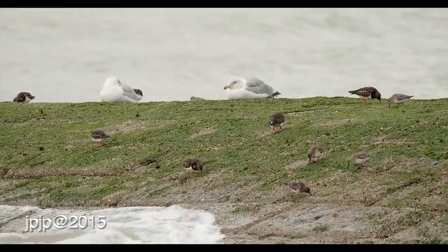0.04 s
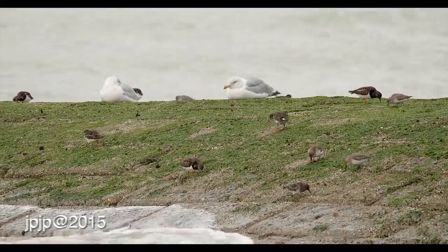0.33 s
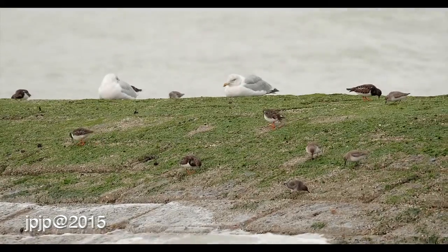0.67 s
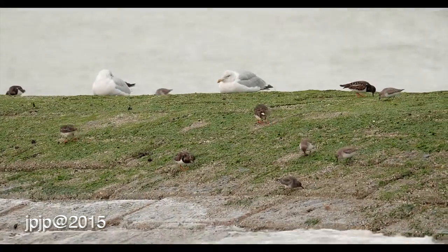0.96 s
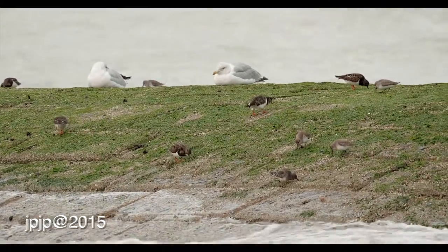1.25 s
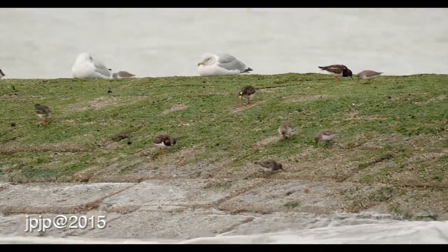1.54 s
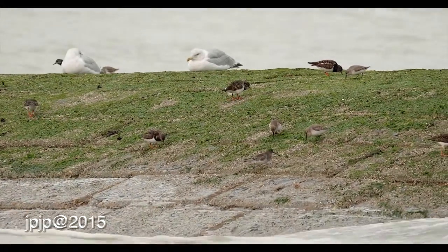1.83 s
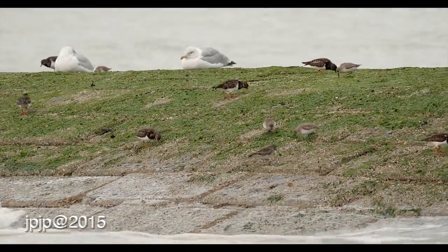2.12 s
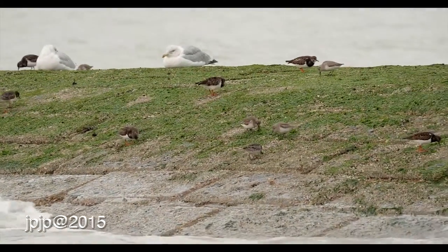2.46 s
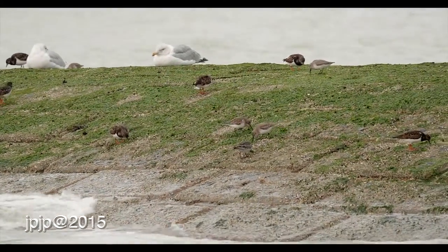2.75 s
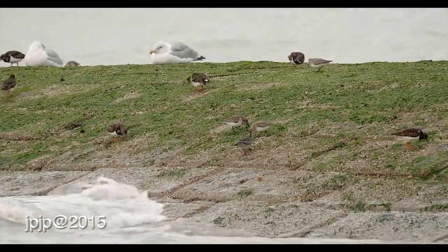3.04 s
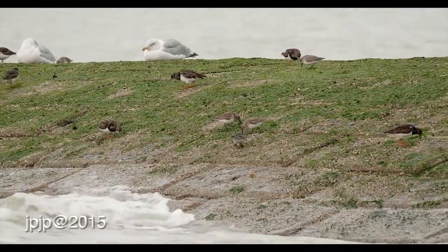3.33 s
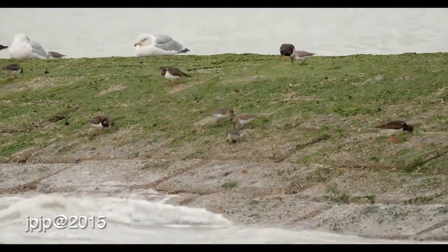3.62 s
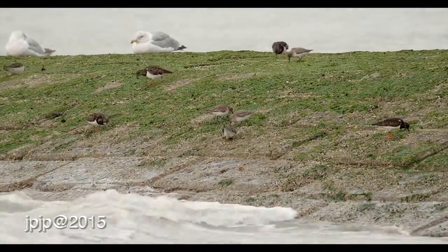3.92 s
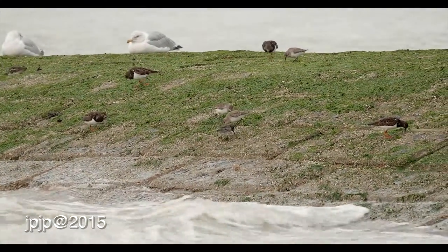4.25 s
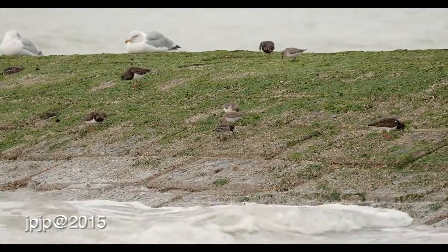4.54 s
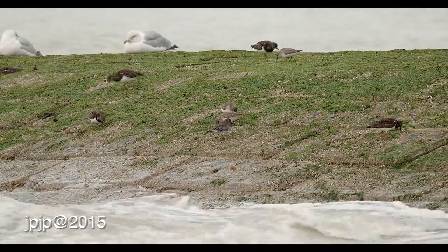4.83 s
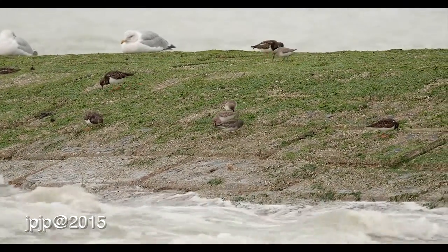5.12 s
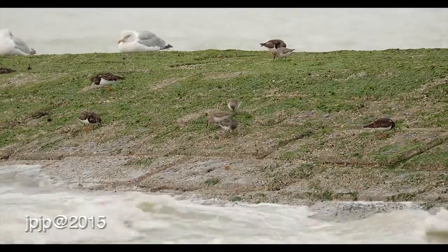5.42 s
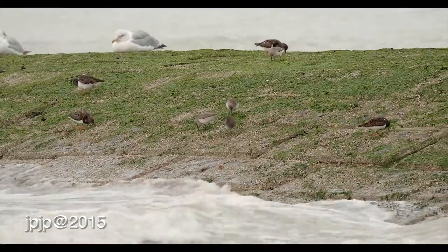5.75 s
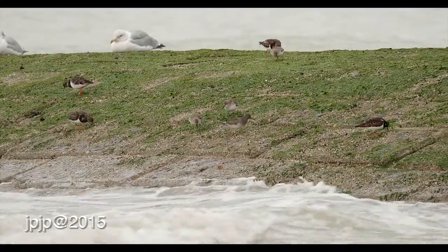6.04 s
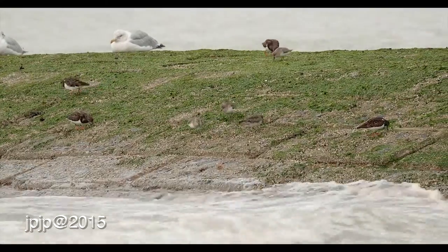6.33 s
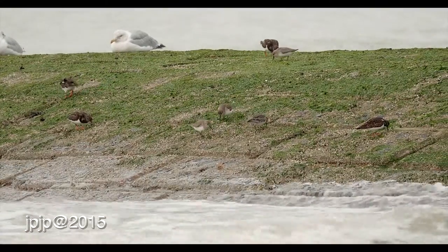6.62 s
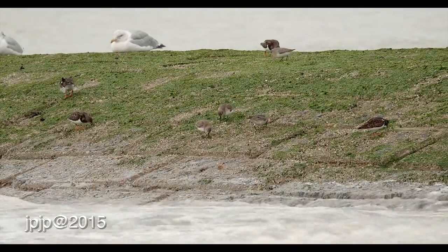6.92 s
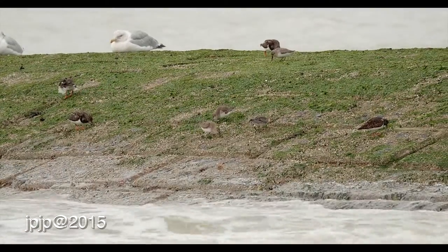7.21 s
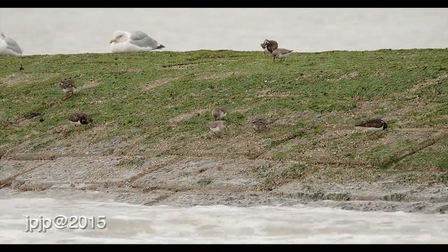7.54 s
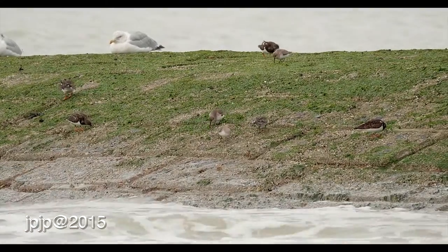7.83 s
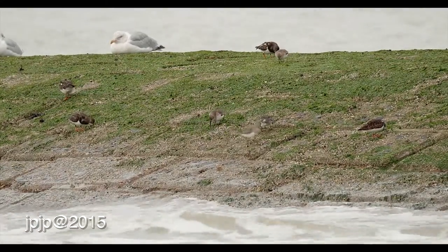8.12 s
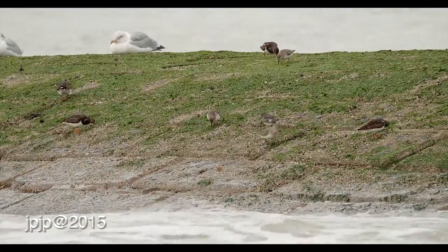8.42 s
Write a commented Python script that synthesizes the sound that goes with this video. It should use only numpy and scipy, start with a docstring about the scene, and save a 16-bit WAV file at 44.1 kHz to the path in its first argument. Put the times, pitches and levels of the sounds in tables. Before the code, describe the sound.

Surf roars steadily against a stone sea wall throughout, with a soft hiss of foam on top. From the first moment, wind buffets the microphone in rapid, low, ragged thumps over a fluttering rumble, mostly on the left. A few sharp pops cut through in the first 1.2 seconds. The puffs stay dense until about 2.7 seconds, drop away briefly, and return in a cluster from 3.3 to 3.8 seconds. A calmer stretch follows until about 5 seconds, broken by a quick burst near 4.2 and faint rumbles on the right. Buffeting resumes at about 5.2 seconds as the surf swells slightly, with more light gusts on the right between 6 and 7 seconds. After a short lull near 7.8 seconds, the puffs build again until the end at about 8.7. The sea dips briefly under each strong puff and swells back.

```python
"""At a stone sea wall on a windy day, surf is heard through a camera's close pair of microphone ports.
Breakers roar and foam hisses as broadband noise. Eddies flutter against the left port in short low
puffs of turbulent pressure; now and then a gust veers round and rumbles at the right one.
The camera's gain control ducks the sea at each strong puff and lets it swell back."""
import sys
import numpy as np
from scipy import signal
from scipy.fft import rfft, irfft, next_fast_len
from scipy.io import wavfile
from scipy.ndimage import uniform_filter1d, map_coordinates

SR = 44100
rng = np.random.default_rng(int(sys.argv[2]) if len(sys.argv) > 2 else 0)


def materialize(psi):
    """Save the field psi as 16-bit PCM at rate SR to the path in sys.argv[1].

    A 1-D psi becomes a single channel; in a 2-D psi each row is a channel.
    """
    bounded = np.clip(np.atleast_2d(psi).T, -1, 1)
    quanta = np.round(bounded * 32767).astype(np.int16)
    wavfile.write(sys.argv[1], SR, quanta)


N = 382347
EDDY_HZ = 220  # pitch of an ordinary eddy
# strength of the airflow at the windward, left port: t/s, level/dB
WINDWARD_FLOW = [(0, -26), (.6, -30.5), (1.3, -34.5), (1.6, -40.5), (2.15, -30), (2.8, -55), (3.5, -31),
                 (4.1, -47.5), (4.95, -49.5), (5.2, -34.5), (5.8, -32), (6.9, -37), (7.4, -29.5),
                 (7.85, -57), (8.67, -27.5)]


def amp(db):
    """Amplitude ratio: tenfold for every 20 dB."""
    return 10 ** (np.asarray(db) / 20)


def unit(x):
    """Normalisation to rms 1."""
    return x / np.sqrt(np.mean(x ** 2) + 1e-20)


def along(points, hz):
    """Interpolation of each column of a table on a logarithmic frequency axis."""
    f, *cols = np.transpose(points)
    return np.array([np.interp(np.log(hz + 1), np.log(f + 1), c) for c in cols])


def contour(rows):
    """Linear interpolation of (time, value) rows at every sample."""
    return np.interp(np.arange(N) / SR, *np.transpose(rows))


def wobble(rate):
    """Random modulation: a spline through `rate` Gaussian knots a second."""
    knots = rng.standard_normal(2048)
    return map_coordinates(knots, [np.arange(N) * rate / SR], mode="wrap")


def swell(t, centre, duration, edge):
    """Bell-shaped envelope, `duration` wide at half height; `edge` steepens its flanks."""
    return 1 / (1 + (2 * np.abs(t - centre) / duration) ** edge)


def smooth(x, seconds):
    """Time average under a triangular window."""
    size = max(1, int(seconds * SR))
    return uniform_filter1d(uniform_filter1d(x, size), size)


def held_to(x, power, seconds):
    """Envelope control: the running mean square of x is brought to the given power."""
    wanted = np.abs(smooth(power, seconds)) + 1e-9
    present = np.abs(smooth(x ** 2, seconds)) + 1e-9
    return x * np.sqrt(wanted / present)


def filtered(x, response):
    """Linear filtering: the spectrum is multiplied by a complex frequency response."""
    size = next_fast_len(N + SR // 4)
    return irfft(rfft(x, size) * response(np.fft.rfftfreq(size, 1 / SR)), size)[..., :N]


def low_cut(hz, corner_hz):
    """Second-order high-pass magnitude: 12 dB an octave below the corner."""
    return hz ** 2 / np.hypot(hz ** 2, corner_hz ** 2)


def noise(spectrum):
    """Spectral shaping of white noise, at rms 1."""
    return unit(filtered(rng.standard_normal(N), lambda hz: amp(along(spectrum, hz)[0])))


def patchy_pair(depth_db):
    """Two independent noises under one random modulation in time and frequency."""
    spectra = signal.stft(rng.standard_normal((2, N)), nperseg=512)[2]
    patches = uniform_filter1d(rng.standard_normal(spectra.shape[1:]), size=7, axis=0)
    patches = uniform_filter1d(patches, size=18, axis=1)
    return signal.istft(spectra * amp(depth_db * unit(patches)), nperseg=512)[1][:, :N]


def surf(foam_hz=4200, roar_db=4.5, foam_db=-12.5, foam_follows=0.84):
    """Partial coherence: roar and foam hiss reach the two ports with a frequency-dependent lag."""
    # roar, swelling as a wave runs up the wall: t/s, level/dB
    wave_levels = [(0, -38), (.3, -42.5), (.8, -41.5), (2.4, -44), (4.3, -42.5), (4.95, -41.5), (5.55, -40),
                   (6.5, -41), (7.7, -42.5), (8.67, -42)]
    # surf spectrum at the ports: f/Hz, left level/dB, right level/dB
    sea_spectrum = [(40.0, -8, -14), (120, 0, -0.5), (260.0, 0, -6), (507, -1.5, -0.5), (1045, -4.5, -10.5),
                    (1403, -5, -20), (2064, -12.5, -19), (2470, -16.5, -20), (3370, -11.6, -22.5),
                    (4510, -22.0, -23.5), (6000, -25, -24), (7400.0, -27, -26.5), (10170, -26.5, -27.5),
                    (12070, -32, -33), (15000.0, -47, -46)]
    # likeness of the surf at the two ports: f/Hz, coherence (0-1), phase lead of the left/rad
    port_coherence = [(120, .6, 0), (510, .79, .4), (920, .65, 1.7), (1430, .46, 3), (2000, .53, 3),
                      (3500, .58, 5.1), (4100, .42, 2.7), (5900, .35, 5.2), (6700, .3, 3.6), (7600, .5, 6),
                      (10000, .57, 5.6), (14000, .8, 6.3)]
    left, independent = patchy_pair(depth_db=0.5)
    coherence = lambda hz: along(port_coherence, hz)[0]
    right = filtered(left, lambda hz: coherence(hz) * np.exp(-1j * along(port_coherence, hz)[1]))
    right += filtered(independent, lambda hz: np.sqrt(1 - coherence(hz) ** 2))
    water = filtered(np.array([left, right]), lambda hz: amp(along(sea_spectrum, hz)))
    roar = filtered(water, lambda hz: 1 / (1 + (hz / foam_hz) ** 8))
    wave_db = contour(wave_levels)
    hiss_db = wave_db.mean() + foam_follows * (wave_db - wave_db.mean()) + foam_db
    churn_db = 0.4 * wobble(9)
    return unit(roar) * amp(wave_db + roar_db + churn_db) + unit(water - roar) * amp(hiss_db)


def airflow(left_db=-2.5, right_db=5.5, lee_db=-46.5, flutter_db=4.0):
    """Turbulence is local: each port rumbles independently, the right sheltered until a gust veers."""
    # rumble of the steady airflow: f/Hz, level/dB
    rumble_spectrum = [(20, -49), (70, -2.5), (110, 0), (175, -1.5), (310, -6.5), (450, -15), (800, -32),
                       (4000, -68)]
    # gusts that veer round to the right port: t/s, level/dB, duration/s
    veers = [(3.678, -34.5, 0.53), (4.162, -36, 0.09), (4.651, -38.5, 0.41), (5.935, -35.5, 0.19),
             (6.293, -37.5, 0.15), (6.913, -34.5, 0.56)]
    t = np.arange(N) / SR
    gust_power = sum((amp(db) * swell(t, s, duration, edge=3)) ** 2 for s, db, duration in veers)
    lee_flow = np.sqrt(amp(lee_db) ** 2 + gust_power)
    rumbles = [noise(rumble_spectrum) * amp(flutter_db * np.tanh(wobble(45))) for _ in range(2)]
    left, right = [held_to(rumble, np.ones(N), seconds=0.08) for rumble in rumbles]
    right = filtered(right, lambda hz: low_cut(hz, corner_hz=120))
    return np.array([left * amp(contour(WINDWARD_FLOW) + left_db), right * lee_flow * amp(right_db)])


def weak_eddies(count=160, per_second=18, offset_db=-0.5, scatter_db=5.5, typical_s=0.021):
    """Advection: small eddies arrive at uneven moments, about as strong as the flow that carries them."""
    jitter, strength, length = rng.standard_normal((count, 3)).T
    times = (np.arange(count) + jitter / 2) / per_second
    levels = np.interp(times, *np.transpose(WINDWARD_FLOW)) + offset_db + scatter_db * np.tanh(strength)
    rows = zip(times, levels, typical_s * 2 ** (length / 2), np.full(count, EDDY_HZ))
    return [row for row in rows if 0 < row[0] < N / SR]


def puffs(eddies, push_db=0.32, ragged_db=3.0, hard_db=-15, tear_db=-15.5, tear_exponent=0.95):
    """Turbulent pressure: each eddy gives a low thump and a brighter tearing that grows with its force."""
    # pressure at the port from an eddy pitched at EDDY_HZ: f/Hz, level/dB
    eddy_spectrum = [(20, -48), (40, -34), (65, -14), (100, -5.5), (160, 1), (220, 0), (310, -4),
                     (420, -11.5), (600, -24.5), (1000, -53), (2500, -74)]
    # tearing sound of a hard eddy: f/Hz, level/dB
    tear_spectrum = [(150, -21), (370, 9.5), (700, 3.5), (1050, -3), (1900, -34), (5000, -52)]
    t = np.arange(N) / SR
    power, weighted_pitch = np.zeros((2, N))
    for s, db, duration, hz in eddies:
        near = slice(max(0, int((s - .12) * SR)), int((s + .12) * SR))
        push = (amp(db) * swell(t[near], s, duration, edge=2.94)) ** 2
        power[near] += push
        weighted_pitch[near] += push * hz
    force = np.sqrt(power)
    # an eddy's force sets the size of the pressure swings, its pitch how fast they run
    speed = weighted_pitch / (power + 1e-20) / EDDY_HZ
    swirl = map_coordinates(noise(eddy_spectrum), [np.cumsum(speed) % N], order=1)
    sputter = amp(ragged_db * wobble(130))
    thumps = filtered(force * swirl * sputter, lambda hz: low_cut(hz, corner_hz=75))
    tear_gain = amp(hard_db + tear_db) * (force / amp(hard_db)) ** tear_exponent
    tearing = sputter * tear_gain * noise(tear_spectrum)
    return amp(push_db) * held_to(thumps, power, seconds=0.013) + tearing


def cracks():
    """Impulse excitation: the hardest eddies slap the port with one sharp jolt of pressure."""
    # jolts: t/s, peak level/dB, upper edge f/Hz
    jolts = [(.051, -3, 5000), (.224, -15, 1500), (.335, -10, 2700), (.511, -1.5, 1650), (1.113, -14, 1100)]
    # spectrum of a snap: f/Hz, level/dB
    snap_spectrum = [(100, -24), (300, -8), (750, 0), (1450, -2), (2100, -13), (8000, -20)]
    snaps = np.zeros(N)
    for s, db, top_hz in jolts:
        jolt = signal.unit_impulse(N, round(s * SR))
        snap = filtered(jolt, lambda hz: amp(along(snap_spectrum, hz)[0]) / (1 + (hz / top_hz) ** 10))
        snaps += amp(db) * snap / snap.max()
    return snaps


def wind():
    """Crosstalk: eddies strike mostly on the left; the stereo circuit feeds some of each port across."""
    # strong eddies at the left port: t/s, level/dB, duration/s, pitch f/Hz
    strong_eddies = [(0.053, -11, 0.028, 221.2), (0.092, -16, 0.011, 220.3), (0.222, -14, 0.014, 231),
                     (0.251, -12.5, 0.0099, 258), (0.333, -12, 0.024, 227.7), (0.371, -20.5, 0.011, 170.3),
                     (0.428, -14, 0.02, 189.9), (0.511, -9.5, 0.016, 240.3), (0.534, -16, 0.0077, 219.9),
                     (0.582, -20, 0.0099, 190), (0.622, -21.5, 0.016, 149.6), (0.727, -21, 0.0092, 239.2),
                     (0.747, -15, 0.019, 279.6), (0.774, -22.5, 0.0082, 231.2), (0.894, -13, 0.024, 220.5),
                     (0.966, -17, 0.014, 230.2), (0.998, -12, 0.025, 199), (1.036, -16.5, 0.014, 280),
                     (1.103, -13.5, 0.012, 301), (1.122, -12, 0.032, 280.2), (1.18, -14, 0.0087, 230.7),
                     (1.315, -23, 0.026, 210), (1.352, -17.5, 0.018, 220), (1.406, -11, 0.033, 240.7),
                     (1.593, -20, 0.011, 240), (1.745, -20.5, 0.026, 229.8), (1.797, -14, 0.009, 250.3),
                     (1.815, -18, 0.014, 211), (1.876, -20.5, 0.032, 208.9), (1.972, -24, 0.014, 210.2),
                     (2.005, -21.5, 0.016, 220), (2.027, -13, 0.011, 220.7), (2.112, -12.5, 0.012, 250.6),
                     (2.136, -16, 0.02, 280.8), (2.195, -14.5, 0.015, 208), (2.217, -16.5, 0.011, 219.1),
                     (2.256, -13.5, 0.016, 251), (2.29, -13, 0.028, 208.8), (2.39, -18, 0.024, 180.3),
                     (2.463, -23, 0.021, 169.2), (2.545, -21, 0.046, 229), (2.69, -19, 0.03, 198.8),
                     (3.023, -30, 0.014, 188.8), (3.27, -18.5, 0.019, 220.6), (3.392, -11, 0.019, 230.6),
                     (3.437, -16, 0.02, 200.2), (3.475, -13, 0.015, 290), (3.56, -26.5, 0.069, 181.1),
                     (3.699, -19, 0.016, 190.3), (3.818, -16.5, 0.0086, 230.5), (4.241, -12, 0.011, 285.4),
                     (4.254, -14, 0.0075, 281), (4.344, -18.5, 0.0095, 211.5), (5.166, -14, 0.013, 259.5),
                     (5.185, -19, 0.0096, 212), (5.245, -22, 0.017, 230.5), (5.274, -20.5, 0.017, 180),
                     (5.351, -18.5, 0.022, 217.6), (5.42, -19, 0.035, 260), (5.456, -17, 0.01, 238),
                     (5.554, -21, 0.028, 239.8), (5.73, -18.5, 0.0082, 251.6), (5.756, -21.5, 0.0091, 249),
                     (5.873, -18, 0.04, 240.3), (5.988, -22.5, 0.027, 200.5), (6.052, -21, 0.028, 208.8),
                     (6.088, -12.5, 0.027, 190.3), (6.214, -26, 0.016, 200.3), (6.258, -24, 0.019, 251.2),
                     (6.332, -20.5, 0.015, 199.7), (6.399, -19, 0.041, 200.8), (6.52, -25.5, 0.01, 209.3),
                     (6.586, -13, 0.013, 221), (6.873, -16.5, 0.0074, 209.4), (7.074, -20, 0.0088, 188.7),
                     (7.114, -20.5, 0.012, 219.6), (7.193, -16, 0.0079, 220.4), (7.242, -13, 0.015, 189.9),
                     (7.348, -14.5, 0.0092, 219.7), (7.375, -24.5, 0.012, 199.8),
                     (7.435, -21.5, 0.022, 211.2), (7.463, -16, 0.015, 210.2), (7.53, -19.5, 0.027, 219.8),
                     (7.558, -19.5, 0.0099, 291), (7.593, -18, 0.0075, 221.1), (7.671, -20.5, 0.013, 191.6),
                     (7.897, -20, 0.016, 208.8), (8.055, -24, 0.013, 228.4), (8.14, -15, 0.015, 220.7),
                     (8.271, -22.5, 0.0087, 190.7), (8.378, -20, 0.054, 210.9), (8.423, -13, 0.011, 190.6),
                     (8.506, -11, 0.0095, 250.3), (8.614, -17.5, 0.017, 210.3), (8.665, -18.5, 0.039, 239)]
    # eddies thrown at the right port by veering gusts: t/s, level/dB, duration/s, pitch f/Hz
    lee_eddies = [(3.757, -31, 0.025, 229), (4.583, -24.5, 0.018, 230.9), (4.636, -26, 0.016, 238.9),
                  (4.714, -30.5, 0.013, 169.9), (6.266, -22.5, 0.026, 230), (6.725, -25.5, 0.015, 249.3),
                  (6.81, -26, 0.017, 139.8)]
    # wind fed to the other channel: f/Hz, amplitude share (negative when inverted)
    crossfeed = [(80, .23), (250, .17), (510, 0), (650, -.12), (1050, -.19), (1500, -.13), (2200, -.3)]
    left, right = airflow()
    left = left + puffs(list(strong_eddies) + weak_eddies()) + cracks()
    right = right + puffs(lee_eddies)
    ports = np.array([left, right])
    return ports + filtered(ports[::-1], lambda hz: along(crossfeed, hz)[0])


def scene():
    """Superposition of the sea and the wind on the microphone."""
    return surf() + wind()


def gain_control(x, threshold_db=-23.5, slope=0.49, release_s=0.13, detector_s=0.018):
    """Compression: the louder channel pulls both down, and the gain recovers gradually."""
    decay = np.exp(-1 / (detector_s * SR))
    power = signal.lfilter([1 - decay], [1, -decay], x ** 2).max(axis=0)
    excess_db = np.maximum(10 * np.log10(power + 1e-12) - threshold_db, 1e-9)
    # peak hold with exponential release
    fall = np.arange(N) / SR / release_s
    held_db = np.exp(np.maximum.accumulate(np.log(excess_db) + fall) - fall)
    return x * amp(-slope * held_db)


def record(dry, low_cut_hz=52, top_hz=15100, ceiling=0.52):
    """Transduction: the camera colours the treble, limits the band, compresses and softly clips peaks."""
    # peaks and dips in the camera's treble, among them a narrow notch: f/Hz, width/Hz, gain/dB
    treble_bands = [(6340, 910, 2.5), (7800, 140, -5), (8400, 370, 2.5), (9300, 500, -2.5), (9650, 400, 4)]
    colour_db = lambda hz: sum(db / (1 + (2 * (hz - f) / width) ** 2) for f, width, db in treble_bands)
    coloured = filtered(dry, lambda hz: amp(colour_db(hz)) * low_cut(hz, low_cut_hz))
    ducked = gain_control(coloured)
    rounded = ducked / (1 + (ducked / ceiling) ** 6) ** (1 / 6)
    return filtered(rounded, lambda hz: hz < top_hz)


dry = scene()
out = record(dry)
materialize(out)
```